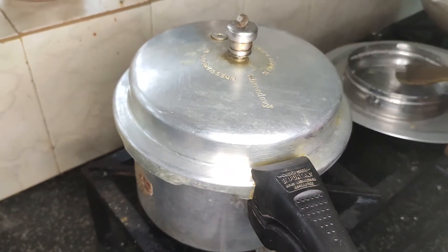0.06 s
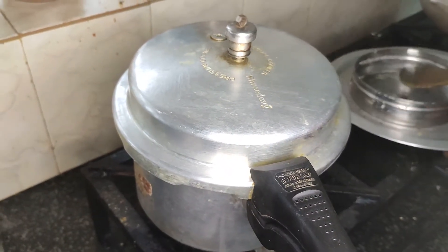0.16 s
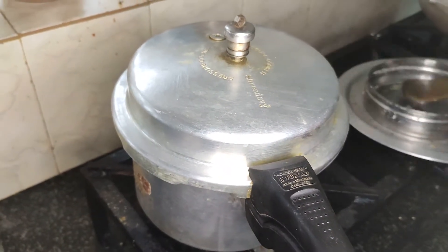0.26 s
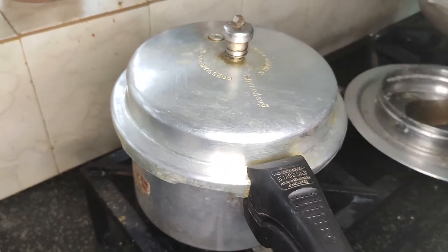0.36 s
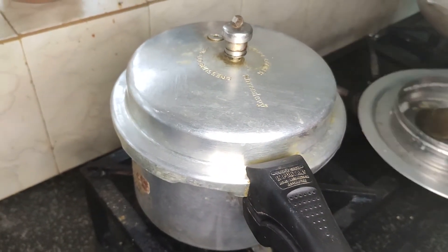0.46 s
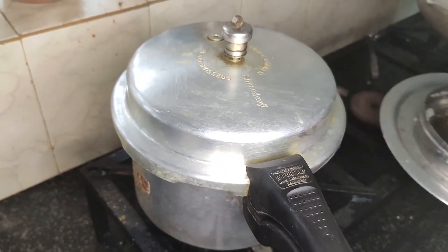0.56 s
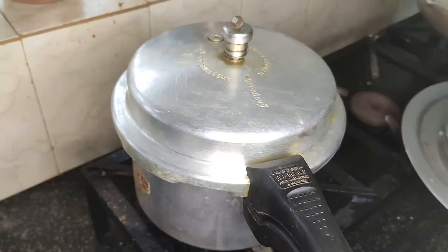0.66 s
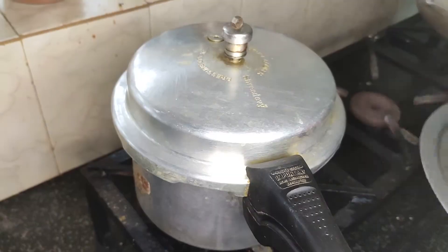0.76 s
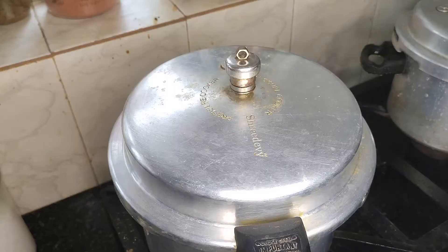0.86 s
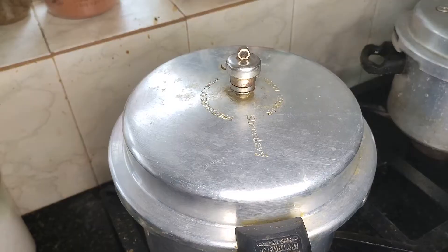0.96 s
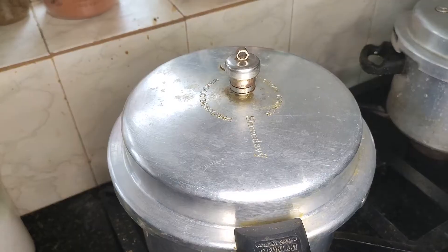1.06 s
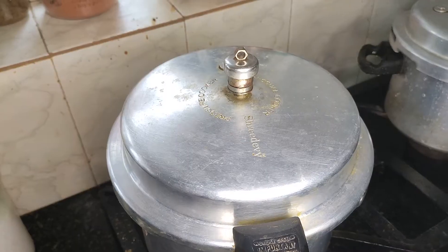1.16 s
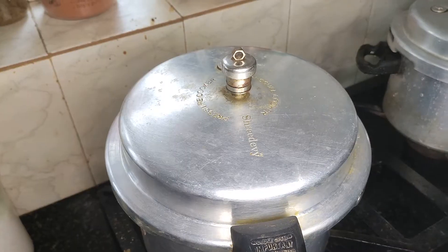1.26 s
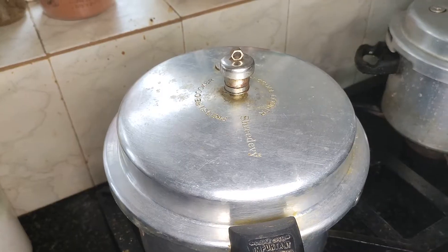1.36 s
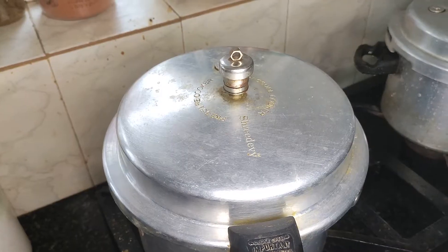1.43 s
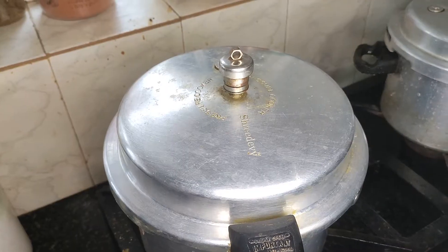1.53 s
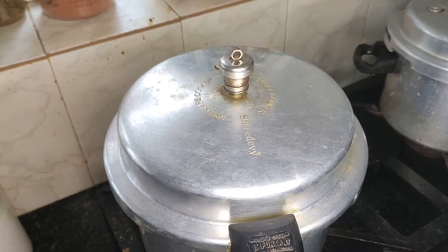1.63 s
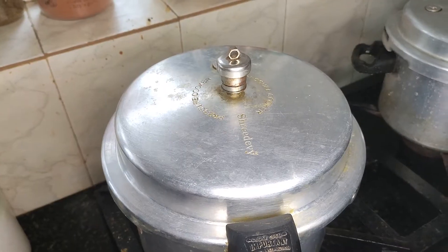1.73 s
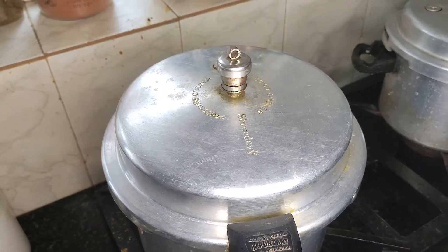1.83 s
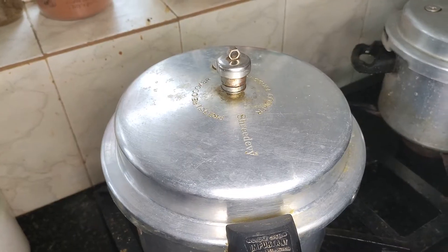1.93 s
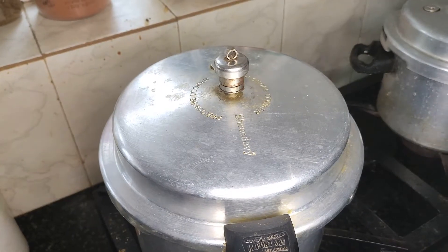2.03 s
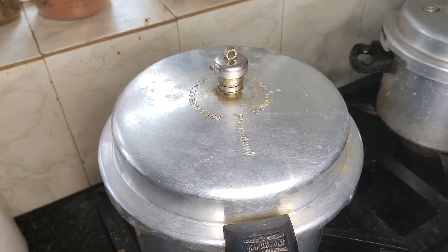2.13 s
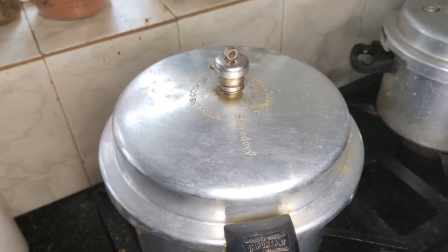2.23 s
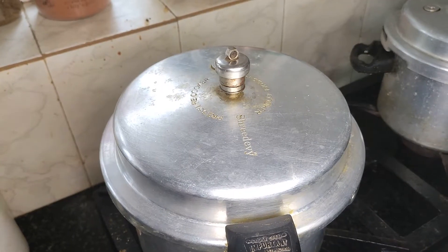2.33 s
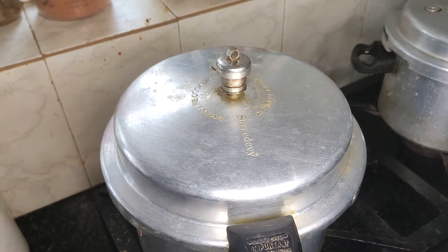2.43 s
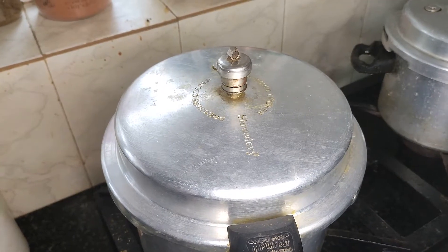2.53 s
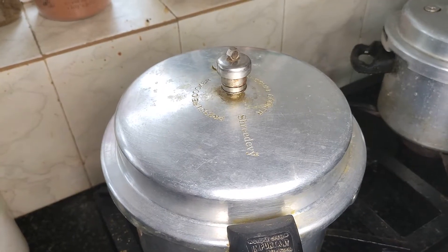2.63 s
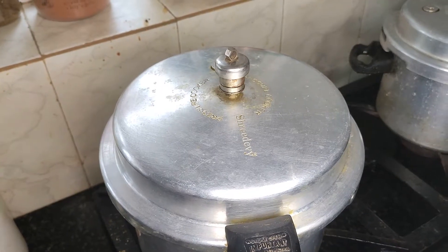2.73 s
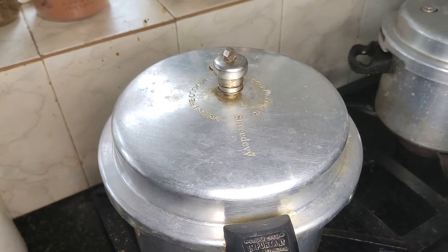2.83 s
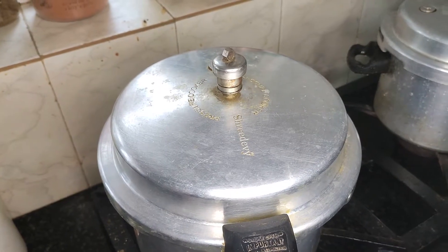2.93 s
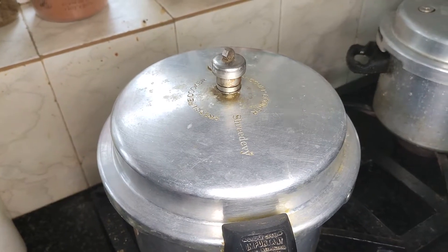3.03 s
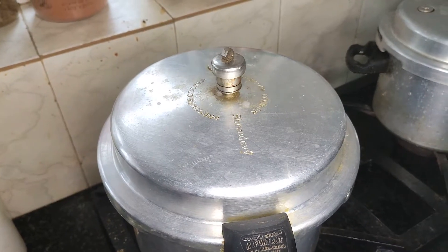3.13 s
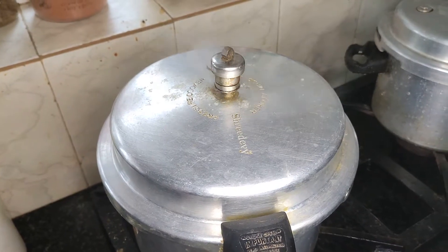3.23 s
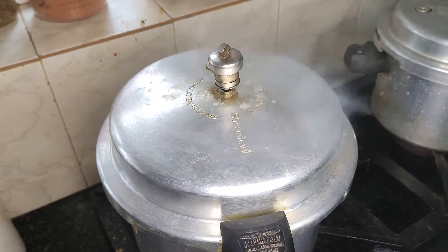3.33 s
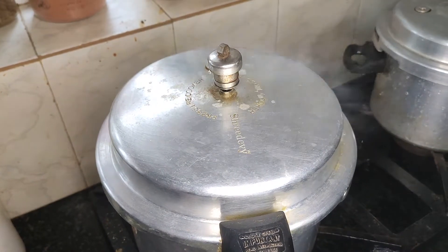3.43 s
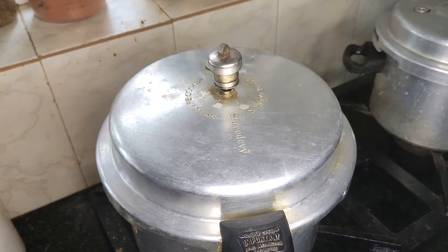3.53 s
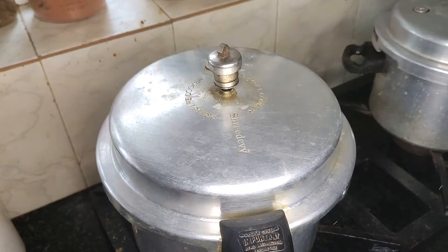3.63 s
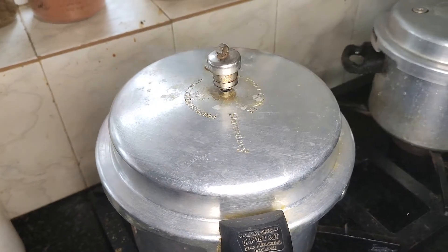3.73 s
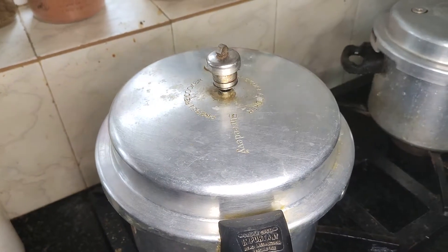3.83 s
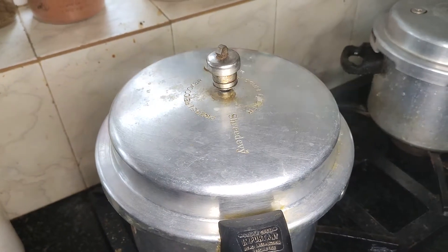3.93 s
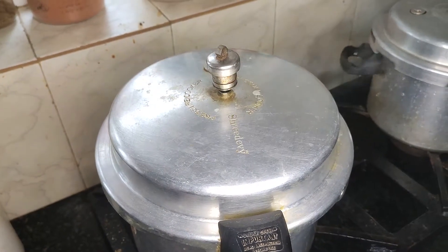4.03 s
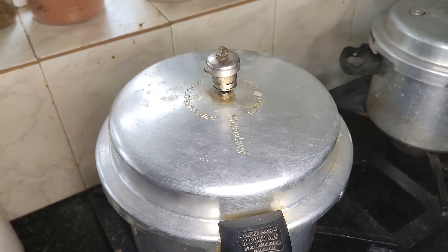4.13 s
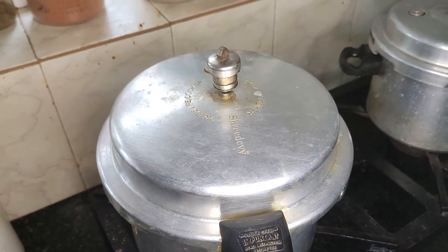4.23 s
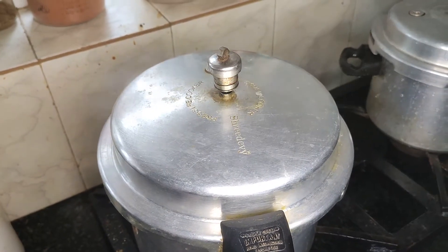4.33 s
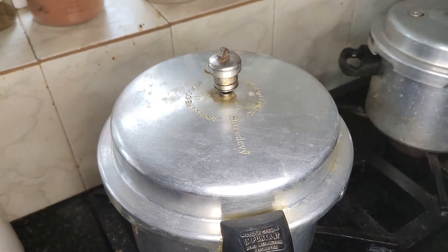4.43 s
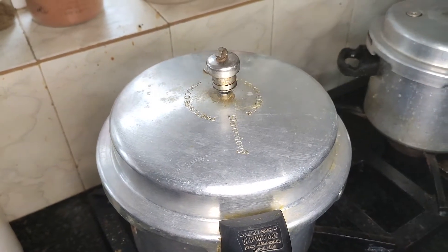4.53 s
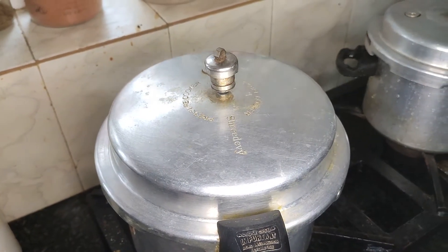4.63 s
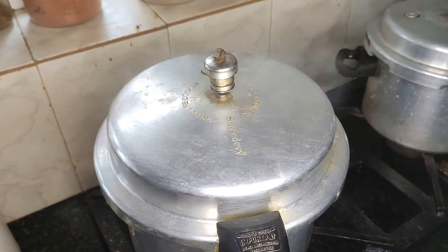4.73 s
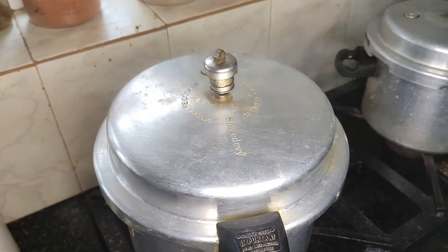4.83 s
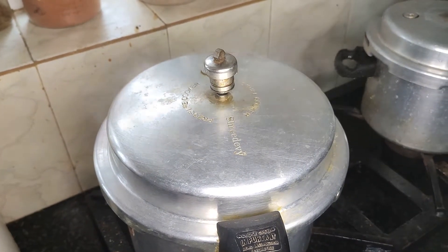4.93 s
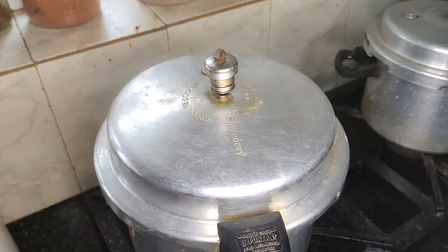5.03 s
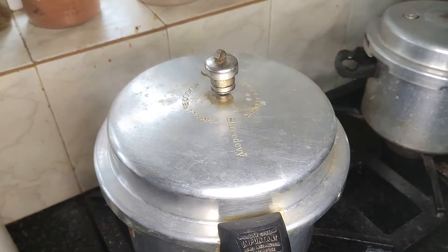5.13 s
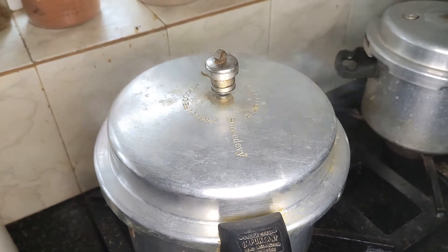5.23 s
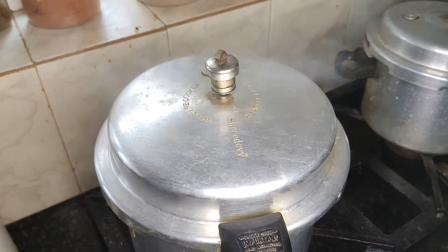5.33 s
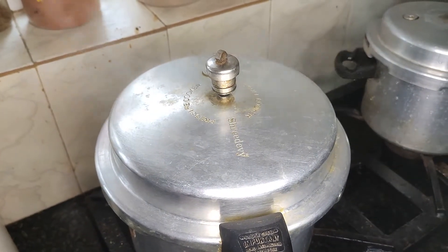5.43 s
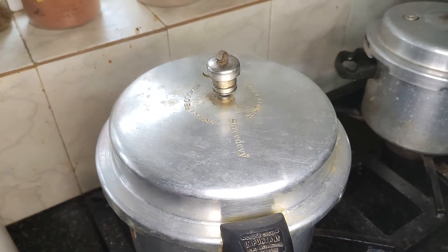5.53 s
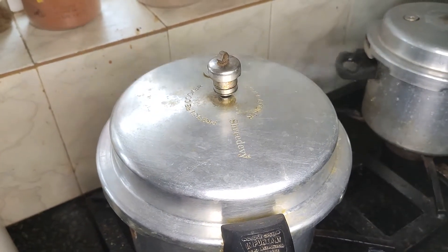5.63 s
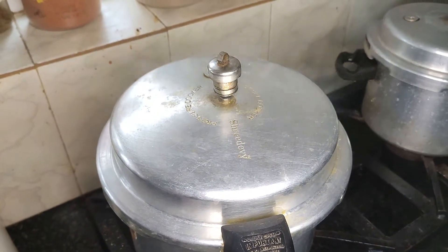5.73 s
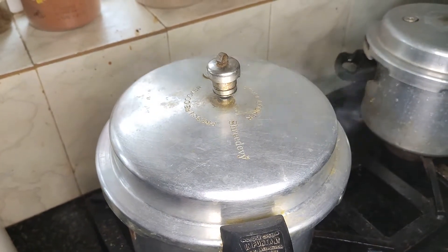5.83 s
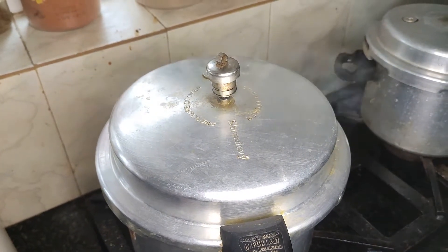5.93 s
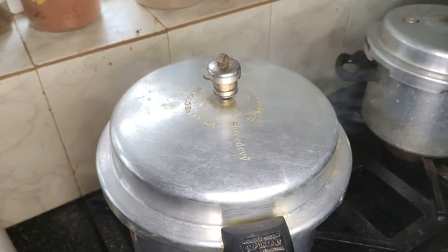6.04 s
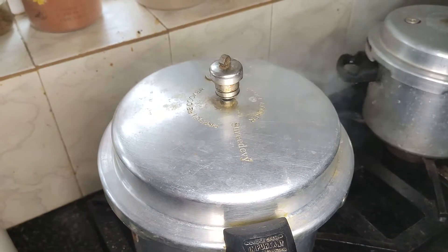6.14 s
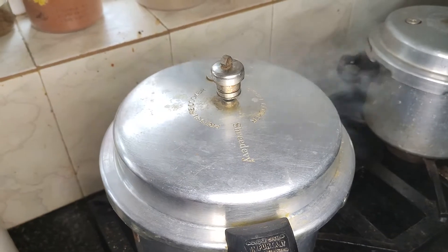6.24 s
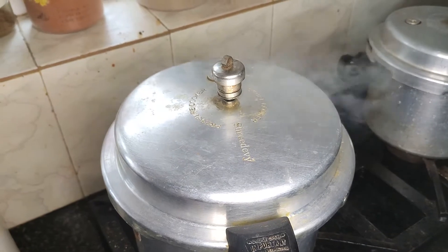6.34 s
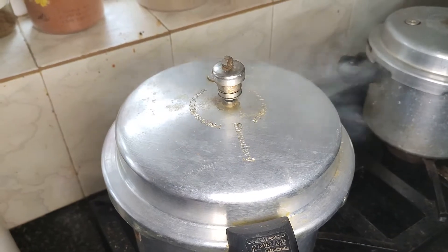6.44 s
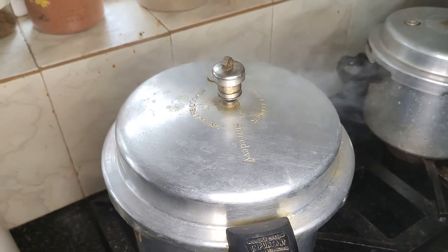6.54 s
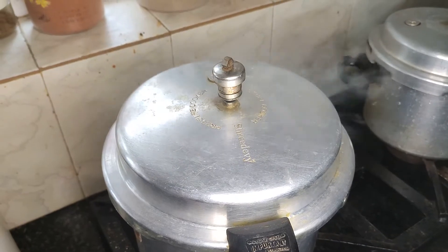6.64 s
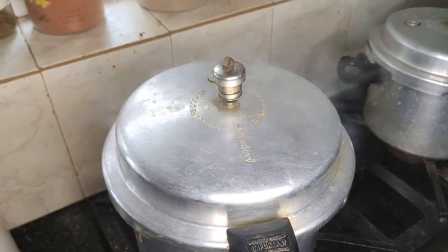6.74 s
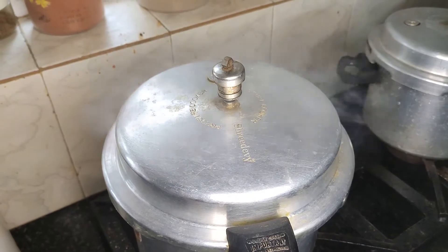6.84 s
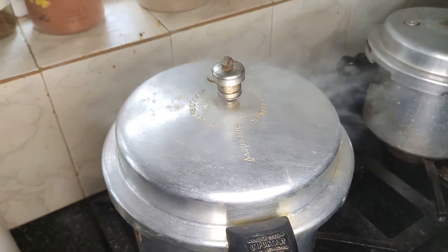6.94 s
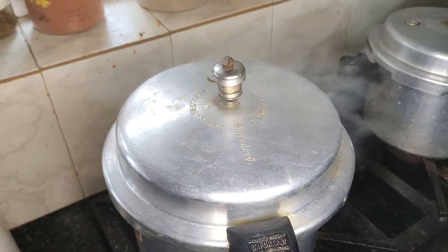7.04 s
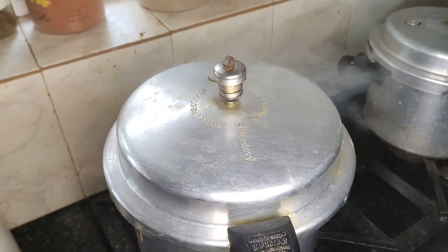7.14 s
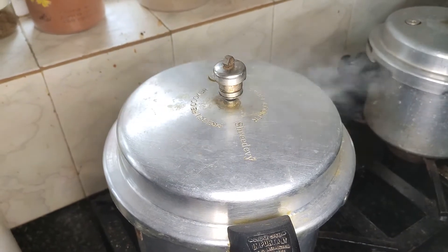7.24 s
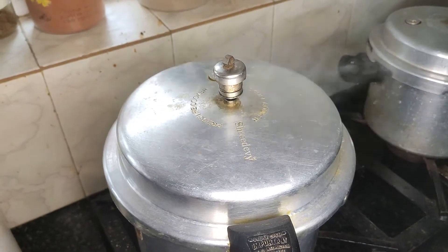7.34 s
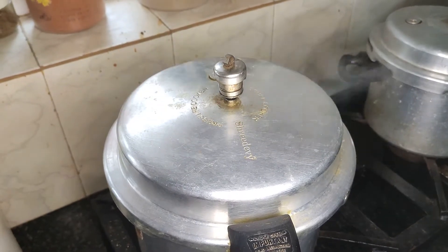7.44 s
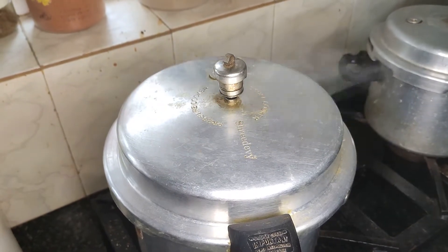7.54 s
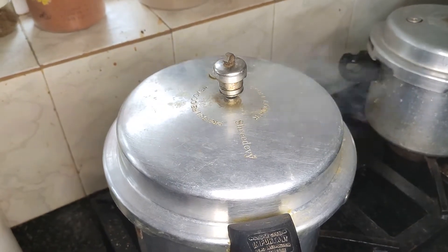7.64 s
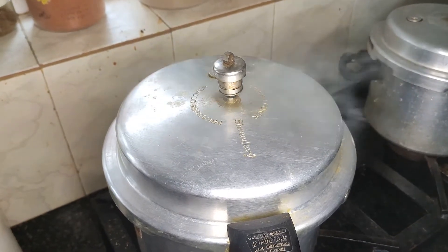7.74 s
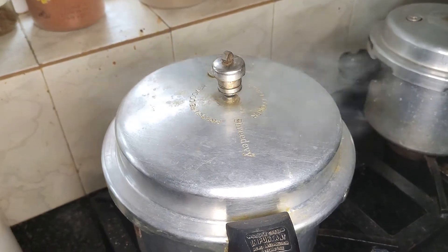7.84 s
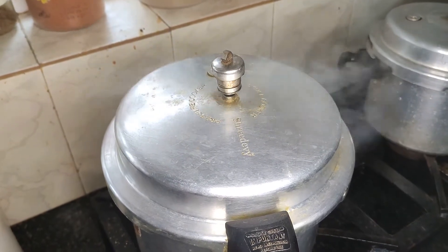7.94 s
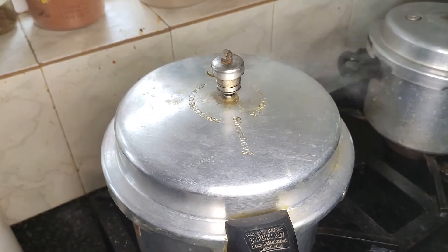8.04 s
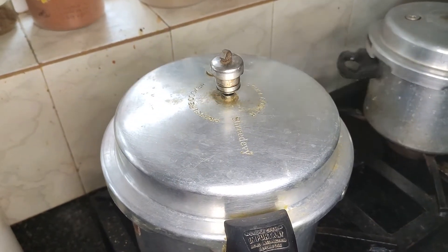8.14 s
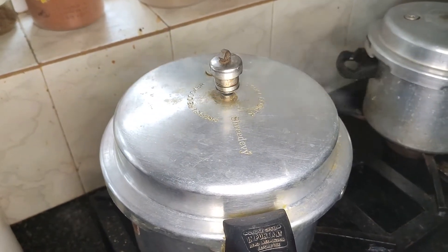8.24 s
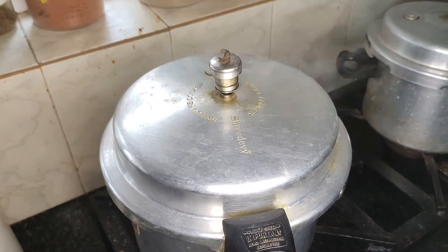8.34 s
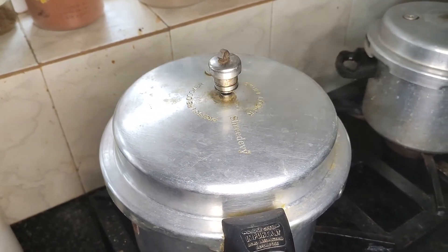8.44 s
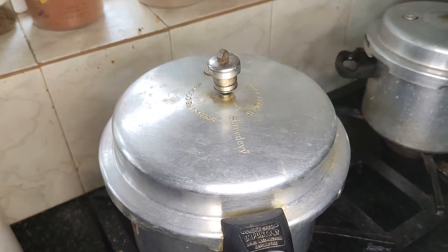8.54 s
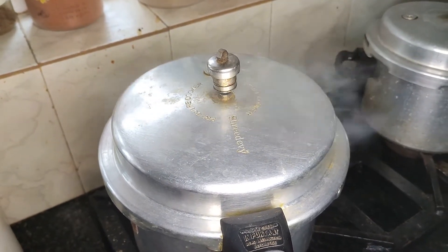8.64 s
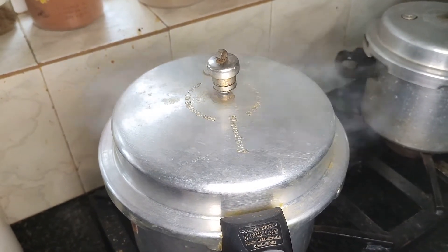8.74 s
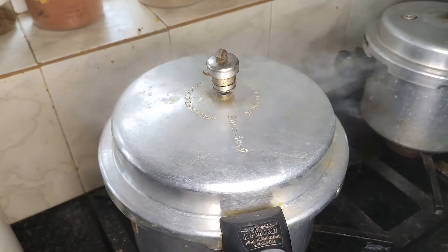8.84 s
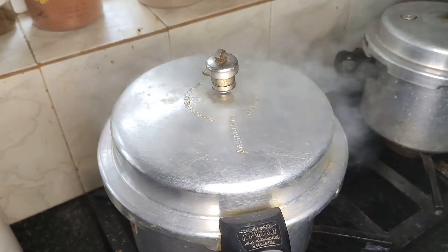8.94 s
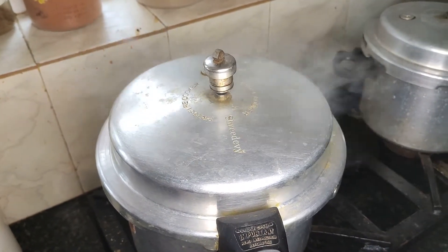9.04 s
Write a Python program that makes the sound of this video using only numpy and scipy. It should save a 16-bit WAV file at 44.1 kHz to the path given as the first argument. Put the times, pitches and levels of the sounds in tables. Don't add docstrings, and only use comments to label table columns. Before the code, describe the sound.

From 0 to 0.36 s a steel bowl is dragged over stone: first a light slide, then from about 0.16 s a harsher, jerky metallic scrape with hollow ringing and a tiny high squeak. At 0.36 s it lands with a clunk and several very quick bounces, echoing briefly off tiles. A faint dull tap follows at 0.71 s. Near 0.83 s the sound cuts briefly to silence, then resumes at a stove with low burner roar, draughty rumble and a fuzzy motor hum. Thin steam leaks in weak, sputtering puffs; between 1.8 and 3.2 s the pot gives short, soft mid-pitched moans. There is a tiny dip at 2.94 s. Around 3.25-3.4 s the flow surges, with a slight tick, into a loud, bright, broad hiss. It stays almost steady, lightly fluttering, until about 9 s. The close microphone is essentially mono.

```python
import sys
import numpy as np
from scipy import signal
from scipy.fft import rfft, irfft, next_fast_len
from scipy.io import wavfile
from scipy.ndimage import uniform_filter1d

SR = 44100
rng = np.random.default_rng(int(sys.argv[2]) if len(sys.argv) > 2 else 0)


def unload_wav(signal):
    wavfile.write(
        sys.argv[1],
        SR,
        np.round(np.clip(np.atleast_2d(signal).T, -1, 1) * 32767).astype(np.int16),
    )


def gain_from_db(level_db):
    decades = np.asarray(level_db, float) / 20
    return 10 ** decades


N = 400428
T = np.arange(N) / SR
SIZE = next_fast_len(N + SR // 10)
HZ = np.fft.rfftfreq(SIZE, 1 / SR)

# sound stops in seconds, fade-in starts in seconds, fade length in
# seconds.
CUTS = [
    (.829, .880, .012),
    (2.9388, 2.9365, .014),
]
# time in seconds, peak in dB.
LIFT_TICK = (3.353, -35)


def evened(x):
    return x / np.sqrt(np.mean(x ** 2) + 1e-20)


def read(points, hz):
    f, value = np.transpose(points)
    return np.interp(np.log(hz + 1), np.log(f + 1), value)


def curve(rows):
    return np.interp(T, *np.transpose(rows))


def swells(rows):
    return sum(db * np.exp(-((T - s) / half) ** 2) for s, half, db in rows)


def shaped(x, gain):
    return irfft(rfft(x, SIZE) * gain, SIZE)[:N]


def noise(gain):
    return evened(shaped(rng.standard_normal(N), gain))


def wander(rate_hz):
    return noise(1 / (1 + (HZ / rate_hz) ** 2) * (HZ > .5))


def mode(hz, width_hz):
    return 1 / (1 + 2j * (HZ - hz) / width_hz)


def gliding_mode(x, hz, width_hz):
    turn = np.exp(2j * np.pi * np.cumsum(hz) / SR)
    r = np.exp(-np.pi * width_hz / SR)
    smoothed = signal.lfilter([1], np.convolve([1, -r], [1, -r]), x / turn)
    return evened((turn * smoothed).real)


def blow(s, db, modes, bright_db, length):
    body = sum((-1) ** k * gain_from_db(g_db) * mode(f, w) for k, (f, w, g_db) in enumerate(modes))
    fading = np.exp(-np.maximum(T - s, 0) / length) * (T >= s)
    burst = (rng.standard_normal(N) + 0.0008 / length) * fading
    tilt = gain_from_db(bright_db * np.log2(HZ / 1000 + .4))
    soft_top = 1 / (1 + 1j * HZ / 7000) ** 2
    thin_bass = 1 / (1 + 200 / (1j * HZ + 1)) ** 2
    ring = shaped(burst, body * tilt * soft_top * thin_bass)
    return gain_from_db(db) * ring / abs(ring).max()


def room(x):
    # frequency in Hz, time to die away by 60 dB in seconds.
    echo_times = [(200, 0.5985), (1000, 0.57), (3000, 0.76), (8000, 0.57), (14000, 0.38)]
    hz, t, z = signal.stft(rng.standard_normal(SR), SR, nperseg=256)
    tail = signal.istft(z * gain_from_db(-60 * t / read(echo_times, hz)[:, None]), SR, nperseg=256)[1]
    return signal.fftconvolve(x, np.pad(tail / np.linalg.norm(tail), (200, 0)))[:N]


def drag():
    # time in seconds, level in dB.
    stroke = [(0.0, -62), (.07, -51.5), (.158, -52), (.164, -46), (.185, -42), (.23, -40.5), (.27, -41.5),
              (.335, -37), (.358, -43)]
    # time in seconds, jump in dB.
    jolts = [(.164, 3.5), (.185, 3.5), (.224, 4.5), (0.246, 5), (.273, 4), (.31, 3)]
    # frequency in Hz, width in Hz, level in dB.
    bowl_modes = [(1050, 51.2, -9), (1270, 47, 0.5), (1550, 36, -24), (2036.9, 57, 1), (2320, 47, -5),
                  (2810, 390, -12), (4500, 260, -25), (5287, 110, -10), (5720, 90, -18), (6630, 130, -18),
                  (7400, 80, -39.5), (8300, 69, -23), (10000, 190, -29), (10900, 80, -25)]
    # frequency in Hz, dB per Hz.
    grit = [(120, -59), (200, -25), (564, 3), (724, -3.5), (2040, -13), (2620, -15), (3610, -21),
            (4240, -25), (5260, -21), (14300, -34)]
    light_colour = [(180, -33.5), (300, -3.5), (494, -16), (670, 2), (1000, -18), (1090, -1), (1230, -30.5),
                    (1360, -1), (1500, -20), (1970, -8.5), (2630, -18), (3510, -16.5), (4400, -22),
                    (4770, -21.5), (14000, -32)]
    # time in seconds, half length in seconds, rise in dB.
    ring_swells = [
        (.168, .01, 14),
        (.245, .02, 8.5),
        (.315, .015, -7),
    ]
    # time in seconds, decay in seconds, level in dB, pitch in Hz.
    squeak_row = (.228, .022, -51, 8320)

    press_s, bite_s = .162, 0.19063
    biting = np.clip((T - bite_s) / .003, 0, 1)
    dull_db, bright_db, dulling_db_per_s = -17.5, -7.5, -36
    bitten_db = bright_db + dulling_db_per_s * np.clip(T - bite_s, 0, .2)
    treble_db = dull_db + biting * (bitten_db - dull_db)
    ring_hz, seated_ring_hz, seat_s = 647, 565, .225
    pitch_hz = ring_hz + (seated_ring_hz - ring_hz) * np.clip((T - seat_s) / .02 + .5, 0, 1)
    ring_db = -9 + swells(ring_swells)
    light_rim_db, biting_rim_db = -22, -9.5
    rim_db = light_rim_db + biting * (biting_rim_db - light_rim_db)
    jolt_db = sum(db * np.exp(-np.maximum(T - s, 0) / 0.0093) * (T >= s) for s, db in jolts)

    slips = rng.standard_normal(N) * gain_from_db(1.4 * rng.exponential(1, N) + wander(200))
    scrape = gain_from_db(-2.5) * shaped(slips, gain_from_db(read(grit, HZ)))
    rasp = gain_from_db(-15) * shaped(slips * gain_from_db(2.19 * wander(60)), mode(2550, 5000) ** 2)
    bowl = scrape + rasp
    contact_db = 2.6 * wander(45)
    for k, (f, w, db) in enumerate(bowl_modes):
        strength = gain_from_db(db + np.roll(contact_db, k * SR // 2))
        bowl = bowl + (-1) ** k * shaped(slips * strength, mode(f, w))
    treble = 1 / (1 + (4200 / (HZ + 1)) ** 8)
    low = evened(shaped(bowl, 1 - treble))
    high = evened(shaped(bowl, treble))
    ring = gliding_mode(slips, pitch_hz, 75)
    rim = evened(shaped(slips * gain_from_db(4 * wander(40)), mode(3640, 350) ** 2))
    hard = low + gain_from_db(treble_db) * high + gain_from_db(ring_db) * ring + gain_from_db(rim_db) * rim
    light = gain_from_db(2.5 + 1.3 * wander(40)) * noise(gain_from_db(read(light_colour, HZ) - 4.955 * (HZ > 4150)))
    rubbing = np.where(T > press_s, hard, light) * (T < stroke[-1][0])

    s, decay, db, hz = squeak_row
    squeak = gain_from_db(db) * (T > s) * np.exp(-np.maximum(T - s, 0) / decay) * noise(mode(hz, 150) ** 2)
    return squeak + gain_from_db(curve(stroke) + 1.5 + jolt_db) * rubbing


def kitchen():
    # frequency in Hz, dB per Hz.
    burner = [(70, -21.5), (115, -3.5), (220, -7), (400, -6), (650, -7), (800, -11), (1050, -16),
              (1600, -19), (3000, -30), (5000, -60)]
    first_air = [(65, -45), (110, -16), (190, -12.5), (350, -9), (550, -14.5), (1000, -14.5), (1350, -21),
                 (2500, -30.5), (5000, -39.5), (9000, -44.5), (14300, -57)]
    draught_colour = [(3, -22.5), (10, -3), (18, -7.5), (25, -0.5), (33, -39), (46, -9), (62, -20),
                      (100, -21.5), (200, -63.5)]
    # frequency in Hz, width in Hz, lift in dB.
    standing = [(193, 10.195, 8), (242.5, 14, 9), (292, 55, 4), (569.43, 20, -18), (623, 18, 3.5),
                (683.75, 37.43, -3), (1314.3, 76.2, 8)]
    # time in seconds, rise in dB.
    thuds = [
        (.185, 12),
        (.36, 17.3),
        (.71, 2.514),
    ]
    # time in seconds, half length in seconds, rise in dB.
    hum_swells = [(.25, 0.1099, 3), (.55, 0.0962, -3.5), (.9, .08, -4), (1.7, .15, -3.5), (2.3, .07, 10.5),
                  (2.75, .25, -3), (3.6, 0.53, 6.5), (4.54, 0.055, 11), (5.0, 0.0634, 6),
                  (7.2, 0.1349, 2.5), (7.9, 0.25, 3)]

    before_cut = T < CUTS[0][0]
    waves_db = sum(db * abs(mode(f, w)) ** 2 for f, w, db in standing)
    thud_decay_s = 0.12
    thud_db = sum(db * np.exp(-np.maximum(T - s, 0) / thud_decay_s) * (T >= s) for s, db in thuds)
    first = gain_from_db(-58 + thud_db) * noise(gain_from_db(read(first_air, HZ)))
    flame = gain_from_db(-54) * noise(gain_from_db(read(burner, HZ) + waves_db))
    flutter = gain_from_db(0.5 + 0.723 * wander(24) + 0.57 * wander(7.2))
    roar = flutter * np.where(before_cut, first, flame)
    draught_db = -52.5 - 5.594 * before_cut + 1.9 * wander(2.1)
    draught = gain_from_db(draught_db) * noise(gain_from_db(read(draught_colour, HZ)))
    hum_db = -61 + swells(hum_swells) + 1.5 * wander(6.813)
    hum = gain_from_db(hum_db) * noise(mode(96.143, 16.6) ** 2)
    return roar + draught + hum


def knocks():
    # time in seconds, peak in dB, brightness in dB per octave.
    bounces = [
        (.362, -23, -2.5),
        (.3685, -22, -3),
        (.375, -27, -3),
        (.383, -30, -3),
    ]
    # time in seconds, peak in dB.
    far_taps = [
        (.7095, -39.5),
    ]
    # frequency in Hz, width in Hz, level in dB.
    landing_modes = [(444, 50, -5), (830, 87, -9), (1040, 35, 3), (1480, 110, 0.5), (1760, 150, -4),
                     (2170, 330, -1), (3660, 300, -3), (5260, 1100, -8), (6660, 600, -27)]
    tap_modes = [(415, 9, 11), (520, 35, -5), (680, 40, -6), (846, 12, 6), (990, 50, -7), (2000, 820, -27)]
    lid_modes = [(870, 60, 0), (1150, 60, -2), (560, 200, -8), (280, 150, -6)]
    landing = sum(blow(s, db, landing_modes, bright_db, .0045) for s, db, bright_db in bounces)
    taps = sum(blow(s, db, tap_modes, 0, .0002) for s, db in far_taps)
    taps = taps + blow(*LIFT_TICK, lid_modes, 0, .0002)
    return landing + taps + gain_from_db(-4) * room(taps)


def steam():
    # frequency in Hz, dB per Hz.
    leak_colour = [(700, -17), (1100, -10), (2100, -7.5), (2800, -8.5), (3900, -3.5), (4700, -4.5),
                   (5900, -0.5), (7600, -1.5), (9500, -2.5), (10500, -3.5), (11300, -8), (14300, -10.5)]
    jet_colour = [(500, -36.5), (900, -23), (1500, -16.5), (2210, -10.5), (2600, -10), (3300, -2),
                  (4000, -2.5), (4500, -3), (6000, -0.5), (8000, 0), (10300, -0.5), (12000, -4),
                  (13200, -10), (14300, -10)]
    # frequency in Hz, lift in dB.
    lid = [(1157, 1), (1490, 3.5), (2288, 5), (2764, 5), (2870, 5), (3094, 3), (3310, 4), (3447, 4),
           (3778, 4), (4039, 5), (5098, 6), (5867, 3.5), (6876, 5), (8007, 5)]
    # time in seconds, hiss level in dB.
    flow = [(.89, -50), (2.0, -49), (3.03, -47.5), (3.19, -48.5), (3.27, -41.5), (3.32, -36), (3.38, -26.5),
            (3.43, -25), (3.9, -24.5), (4.5, -24.5), (5.5, -25.5), (5.76, -24), (5.9, -25), (7.5, -25.5),
            (9.08, -26)]
    # time in seconds, half length in seconds, rise in dB.
    puffs = [(.91, .03, 2), (1.07, .04, 1.5), (1.39, .04, 2), (1.62, 0.0682, 1.5), (2.1, .06, 0),
             (2.42, .05, 0.5), (2.61, 0.0332, 1.5), (2.86, .04, 0.5), (3.125, 0.055, 4.5)]

    puff_db = swells(puffs)
    flow_db = curve(flow) + puff_db
    leak_db, jet_db = -44.5, -24
    lift = np.clip((flow_db - leak_db) / (jet_db - leak_db), 0, 1)

    burst_db = 1.5 * np.exp(-abs(T - LIFT_TICK[0]) / 0.87)
    top_leak_db, top_jet_db = -0.5, 0.03
    top_db = top_leak_db + (top_jet_db - top_leak_db + burst_db) * lift + 0.5 * wander(2.742)
    low_leak_db, low_jet_db = -1.1029, 0.07
    low_db = low_leak_db + (low_jet_db - low_leak_db) * lift
    low_db = low_db + 3.5 * np.sin(np.pi * lift) ** 2 + 0.5 * wander(1.8)
    gap_db = 0.5 * lift + (1 - lift) * (2 + 0.87 * puff_db + wander(8.7))

    lid_db = sum(db * abs(mode(f, 40)) ** 2 for f, db in lid)
    leak = noise(gain_from_db(read(leak_colour, HZ) + 0.53 * lid_db))
    jet = noise(gain_from_db(read(jet_colour, HZ) + .8 * lid_db))
    hiss = np.sqrt(1 - lift) * leak + np.sqrt(lift) * jet

    hz, t, z = signal.stft(hiss, SR, nperseg=256, noverlap=192)
    patches = uniform_filter1d(rng.standard_normal(z.shape), size=9, axis=0)
    eddies = evened(uniform_filter1d(patches, size=40, axis=1))
    top = np.clip((hz[:, None] - 6000) / 4000, 0, 1)
    low = np.clip((3500 - hz[:, None]) / 1500, 0, 1)
    z = z * gain_from_db(0.51 * eddies + top * np.interp(t, T, top_db) + low * np.interp(t, T, low_db))
    gap_hz, gap_width_hz = 9330, 731
    gap = np.exp(-((hz[:, None] - gap_hz) / gap_width_hz) ** 2)
    z = z * gain_from_db(np.interp(t, T, gap_db) * gap)
    hiss = signal.istft(z, SR, nperseg=256, noverlap=192)[1][:N]

    spurts_db = (.9 - .5 * lift) * wander(33) + 0.2614 * wander(1200)
    return gain_from_db(flow_db + spurts_db) * hiss * (T > CUTS[0][0])


def moan():
    # start in seconds, length in seconds, level in dB, pitch in Hz, width in Hz.
    moans = [(1.83, .05, -65, 700, 37), (1.93, .19, -59, 686, 44.4), (2.13, .1, -57, 696.3, 33.3),
             (2.36, 0.09048, -54, 700, 33), (2.48, 0.3114, -62.5, 702.5, 37), (2.84, 0.083, -63, 690, 37),
             (3.02, .13, -57.5, 683, 29), (3.18, 0.06626, -60, 705, 37), (2.34, .2, -64.5, 868.8, 25),
             (2.95, .24, -63, 860, 12)]
    edge_s = .02
    rattling = rng.standard_normal(N)
    out = np.zeros(N)
    for s, length, db, hz, width_hz in moans:
        spell = np.clip(np.minimum(T - s, s + length - T) / edge_s + .5, 0, 1)
        ring = shaped(rattling, mode(hz, width_hz) ** 2)
        out = out + gain_from_db(db) * spell * ring / ring[spell > 0].std()
    return out


def scene():
    steel = drag() + knocks()
    air = kitchen()
    hiss = steam()
    far_hiss = shaped(hiss, 1 / (1 + (HZ / 5500) ** 2))
    far_steel = shaped(steel, 1 / (1 + (HZ / 3800) ** 2))
    echo = room(gain_from_db(-8) * far_steel + gain_from_db(-8) * far_hiss)
    mix = steel + hiss + echo + air + moan()
    for stop, start, fade in CUTS:
        mix = mix * np.where(T < stop, 1, np.clip((T - start) / fade, 0, 1) ** 2)
    return np.array([mix, mix])


def top_cut(x):
    return signal.sosfilt(signal.butter(12, 15470, fs=SR, output="sos"), x)


def record(dry):
    # time in seconds, lowest frequency in Hz, highest frequency in Hz.
    fills = [(2.01, 8900, 10400), (2.05, 6900, 8300), (2.22, 8900, 11800), (2.22, 6200, 7600),
             (3.19, 11000, 12500), (3.84, 11000, 12500), (3.84, 7500, 9000), (4.07, 4600, 9000),
             (4.19, 7500, 9150), (5.37, 6900, 9000), (5.51, 4600, 5800), (5.84, 12400, 13900),
             (5.86, 8200, 9900), (5.859, 6260, 7600), (6.56, 5160, 6400), (6.6, 5138, 8400),
             (7.41, 10900, 13900), (7.41, 4600, 6360), (7.64, 10200, 11900), (7.92, 8200, 9800),
             (7.92, 6260, 7600), (8.711, 8300, 9800), (8.75, 7500, 9000), (8.75, 4170, 5800)]
    hz, t, z = signal.stft(dry[0], SR, nperseg=1024, noverlap=768)
    filled = sum((abs(t - s) < .009) * ((hz > lo) & (hz < hi))[:, None] for s, lo, hi in fills)
    level = np.sqrt(uniform_filter1d(abs(z) ** 2, size=30, axis=0))
    turn = rng.standard_normal(z.shape) + 1j * rng.standard_normal(z.shape)
    unlike = gain_from_db(0.5) * signal.istft(filled * level * turn, SR, nperseg=1024, noverlap=768)[1][:N]
    edge_hz = 14330
    edge = np.sin(np.pi / 2 * np.clip((edge_hz - HZ) / 120, 0, 1)) ** 2
    limited = np.array([shaped(dry[0] + unlike, edge), shaped(dry[1] - unlike, edge)])
    return top_cut(limited)


dry = scene()
out = record(dry)
unload_wav(out)
```